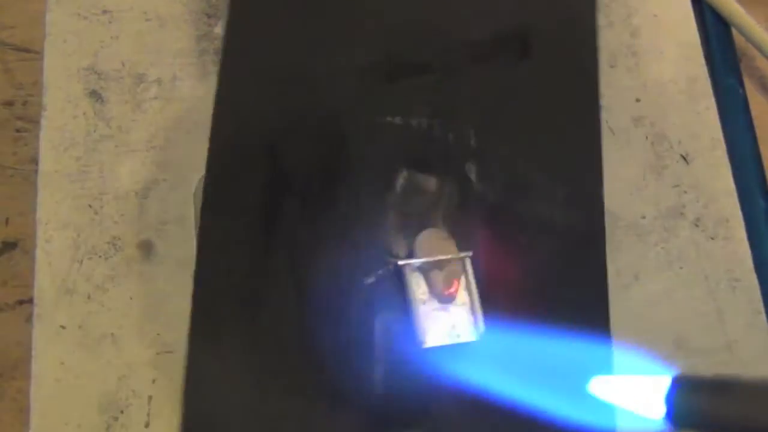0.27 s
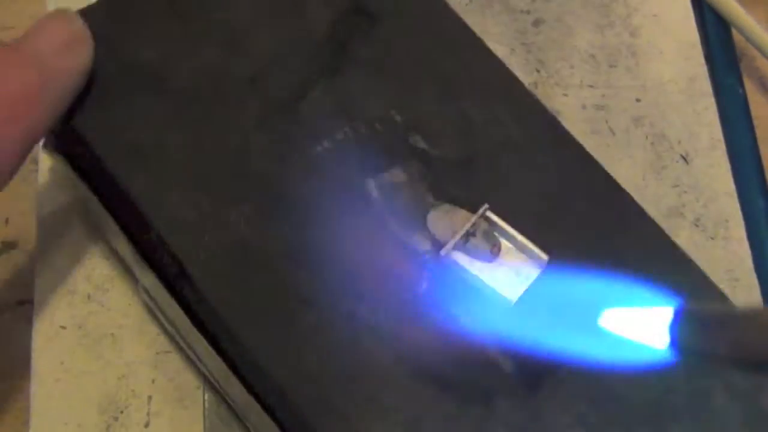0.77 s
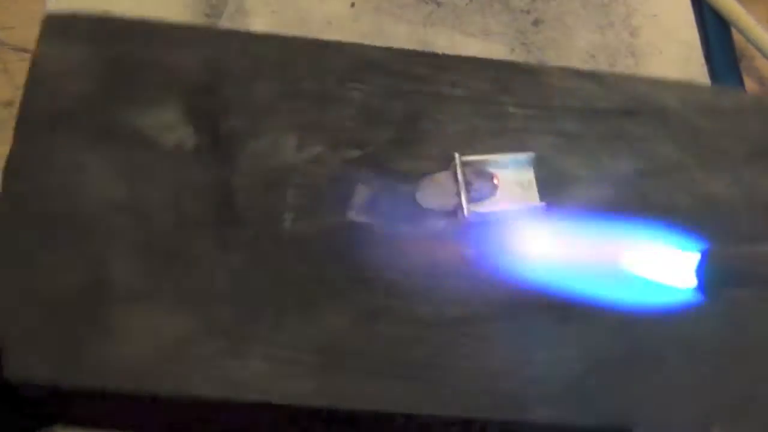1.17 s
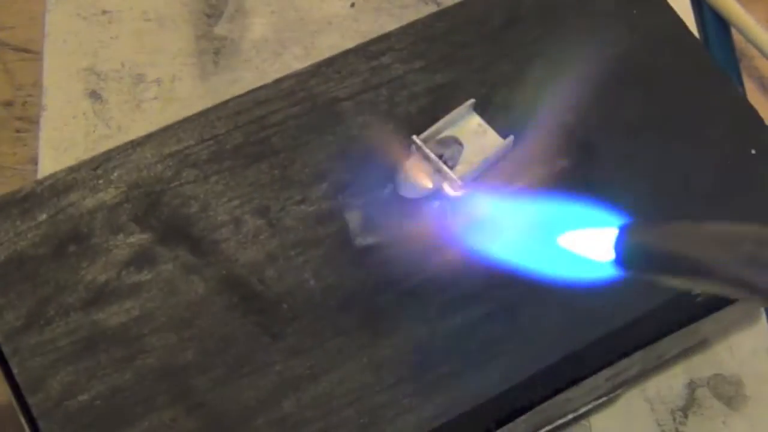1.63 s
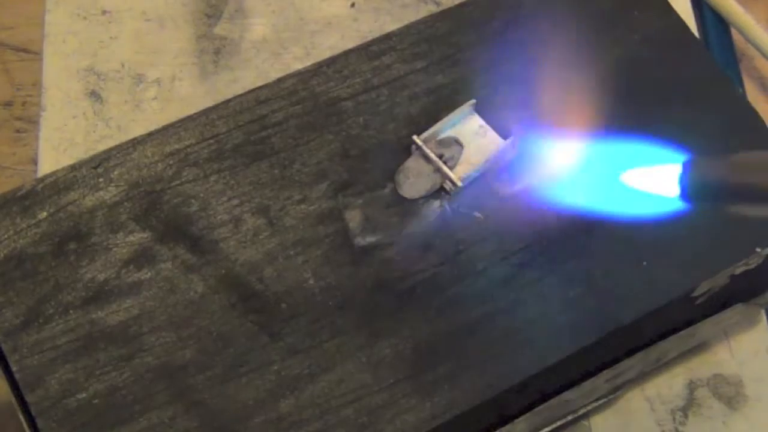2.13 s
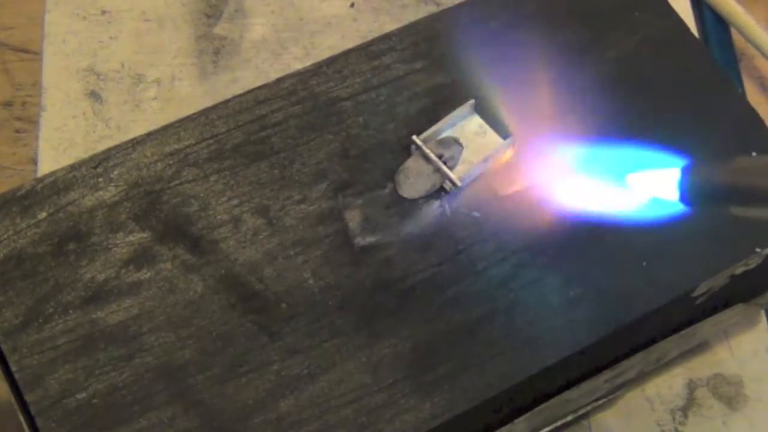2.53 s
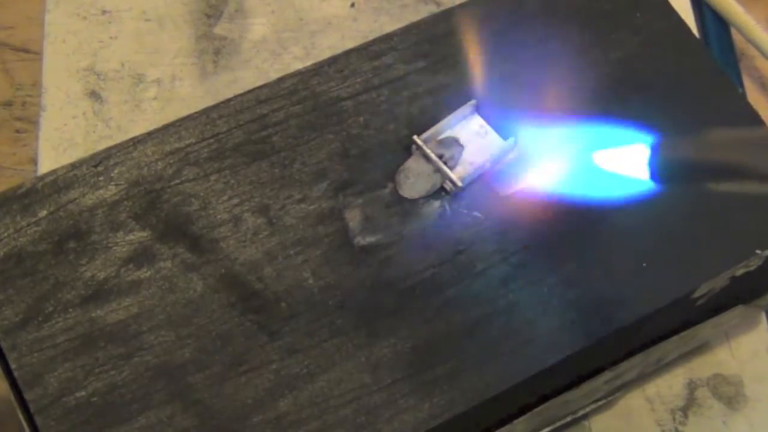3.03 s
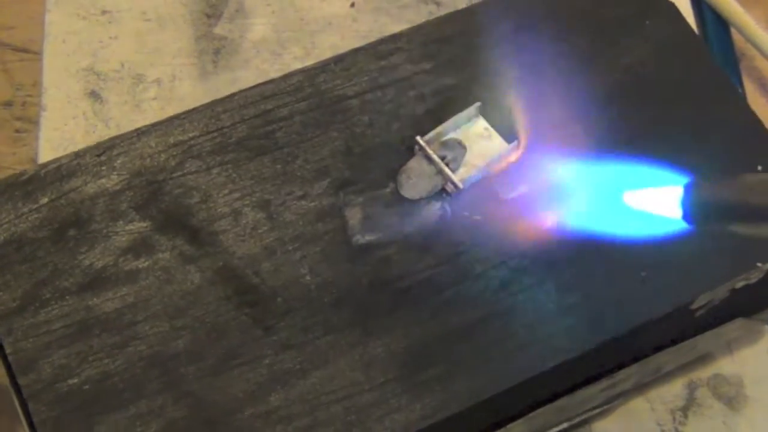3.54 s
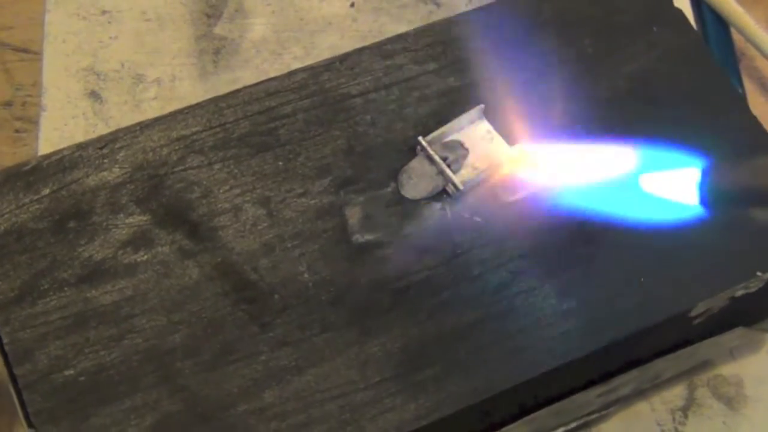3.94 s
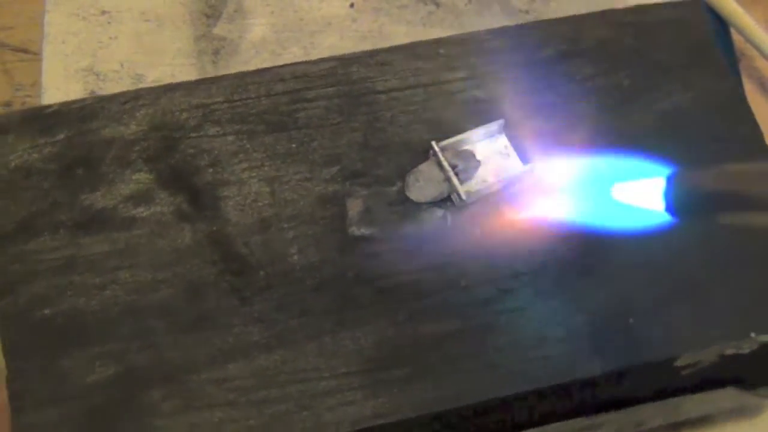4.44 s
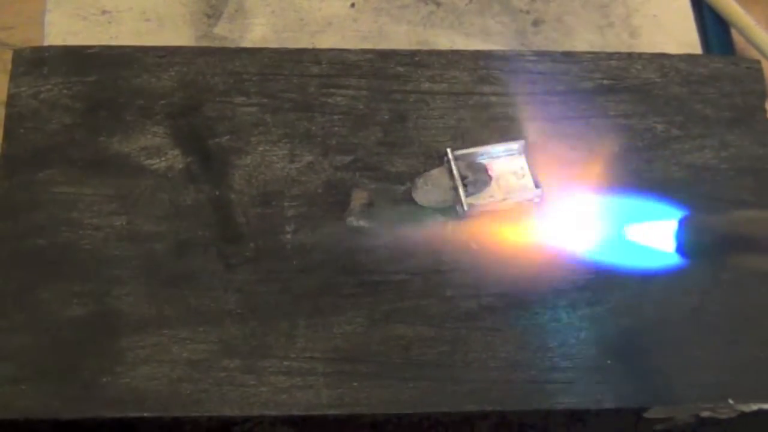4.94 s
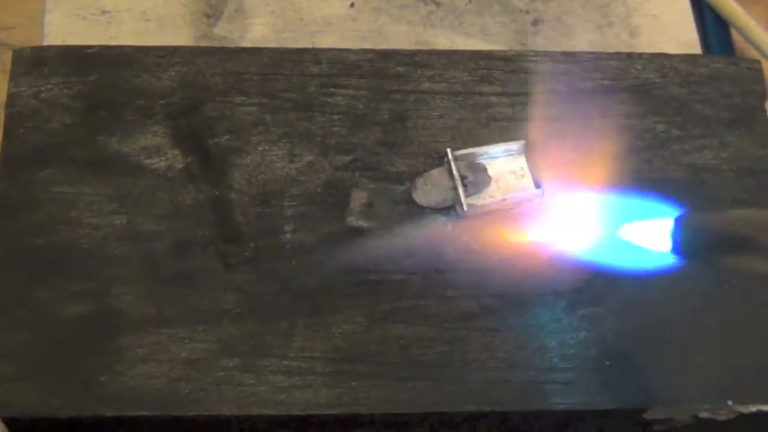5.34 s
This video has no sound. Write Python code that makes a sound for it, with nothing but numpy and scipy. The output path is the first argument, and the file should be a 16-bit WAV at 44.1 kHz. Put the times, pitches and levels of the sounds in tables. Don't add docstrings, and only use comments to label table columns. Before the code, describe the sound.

Close, continuous hiss and fluttering roar of a hand torch, peppered with tiny dry pops, its tone sliding as the flame sweeps over metal.

```python
import sys
import numpy as np
from scipy import signal
from scipy.fft import rfft, irfft, next_fast_len
from scipy.io import wavfile
from scipy.ndimage import uniform_filter1d, map_coordinates

SR = 44100
rng = np.random.default_rng(int(sys.argv[2]) if len(sys.argv) > 2 else 0)


def inscribe(sig):
    pcm = np.round(np.clip(np.atleast_2d(sig).T, -1, 1) * 32767)
    wavfile.write(sys.argv[1], SR, pcm.astype(np.int16))


def voltage_ratio(decibels):
    exponent = np.asarray(decibels, float) / 20
    return 10 ** exponent


N = 246959
T_S = np.arange(N) / SR
MEAN_HEIGHT_CM = 4.6


def unit(x):
    return x / np.sqrt(np.mean(x ** 2) + 1e-20)


def along(points, hz):
    f, v = np.transpose(points)
    return np.interp(np.log(hz + 1), np.log(f + 1), v)


def modes_db(modes, hz):
    return sum(db / (1 + ((hz - centre) / width * 2) ** 2) for centre, width, db in modes)


def wobble(rate_hz):
    return map_coordinates(rng.standard_normal(N // 64), [T_S * rate_hz])


def coloured(x, level_db, lag=1, turn_rad=0):
    size = next_fast_len(N + 8192)
    gain = voltage_ratio(level_db(np.fft.rfftfreq(size, 1 / SR)))
    cepstrum = irfft(np.log(gain), size)
    cepstrum[1:size // 2] *= 2
    cepstrum[size // 2 + 1:] = 0
    response = rfft(cepstrum)
    transfer = np.exp(response.real + 1j * (lag * response.imag + turn_rad))
    return irfft(rfft(x, size) * transfer, size)[..., :N]


def wide_noise(level_db, width):
    mid = coloured(rng.standard_normal(N), level_db)
    side = coloured(rng.standard_normal(N), lambda hz: level_db(hz) + along(width, hz))
    return unit(np.array([mid + side, mid - side]))


def workshop():
    # f/Hz, level/dB
    air = [(5, -10), (14, -17), (25, -19), (42, -18), (52, -19), (80, -19), (108, -11), (166, -13),
           (198, -9), (238, -12), (376, -11), (408, -13), (700, -4), (910, -34), (1540, -120)]
    # f/Hz, side re mid/dB
    air_width = [(30, -55), (60, -30), (90, -20), (160, -13.5), (600, -16.5)]
    # f/Hz, peak/dB, growth/(dB/s), phase drift/rad
    partials = [(14.12, -65, 0, .05), (28.24, -77, 0, .1), (42.4, -76, 0, .2), (59.2, -72, 0, .4),
                (119.9, -76, 2, .3), (156, -84, -1, 1.2), (193.0, -78.5, 0, 1.4)]
    loudest_s, sag_db_per_s2 = 2.7, .8
    hum = np.zeros(N)
    for hz, db, growth_db_per_s, drift_rad in partials:
        level_db = db + growth_db_per_s * (T_S - 4.5) + 1.2 * wobble(1.9)
        if 50 < hz < 70:
            level_db -= sag_db_per_s2 * (T_S - loudest_s) ** 2
        hum += voltage_ratio(level_db) * np.sin(2 * np.pi * hz * T_S + drift_rad * wobble(5))
    return hum + voltage_ratio(-63.5) * wide_noise(lambda hz: along(air, hz), air_width)


def room(x, side_db):
    # f/Hz, t60/s
    decay = [(300, 1), (2000, 0.057), (10000, 0.96)]
    hz, t_s, z = signal.stft(rng.standard_normal((2, SR // 3)), SR, nperseg=256)
    fading = voltage_ratio(-60 * t_s / along(decay, hz)[:, None])
    mid, side = signal.istft(z * fading, SR, nperseg=256)[1]
    tail = np.array([mid + voltage_ratio(side_db) * side, mid - voltage_ratio(side_db) * side])
    delayed = np.pad(x, (60, 0))[None]
    return signal.fftconvolve(delayed, tail / np.linalg.norm(mid), axes=1)[:, :N]


def height_cm():
    # t/s, height/cm
    turning_points = [(0.0, 4.8), (1.45, 4.8), (2.02, 4.36), (2.24, 4.4), (2.419, 4.8), (2.6, 4.16),
                      (2.797, 4.87), (3.02, 4.12), (3.28, 5.0), (3.58, 4.12), (3.86, 4.97), (4.1, 4.2),
                      (4.3, 4.82), (4.6, 4.12), (4.829, 4.35), (5.052, 4.16), (5.249, 4.92), (5.45, 4.2)]
    s, cm = np.transpose(turning_points)
    index = np.arange(len(s))
    step = np.interp(T_S, s, index)
    eased = np.floor(step) + (1 - np.cos(np.pi * (step % 1))) / 2
    return np.interp(eased, index, cm)


def vigour():
    # t/s, swell/dB, length/s
    flares = [(0.16, 5, .05), (0.36, 4, .2), (0.64, 2, .05), (0.86, 2, .05), (1.02, 3.5, .08),
              (1.42, 3, .08), (1.73, 3, .14), (2.42, 3, .08), (2.75, 2, .08), (2.93, 3, .05), (3.15, 5, .1),
              (3.29, 3, .06), (3.61, 4.5, .05), (4.04, 3, .05), (4.22, 3, .06), (4.58, 3, .03),
              (4.78, 3, .06), (4.95, 3, .06), (5.14, 5, .04), (5.3, 3, .12), (5.49, 1, .06)]
    # t/s, dip/dB
    falters = [(0.12, -5), (0.57, -5), (1.27, -5), (1.5, -3.5), (1.84, -4), (2.28, -5), (2.36, -3),
               (2.58, -4), (2.86, -4.5), (3.09, -6), (3.235, -7), (3.5, -3), (4.119, -5), (4.55, -4),
               (4.619, -5.5), (4.72, -5), (5.09, -6)]
    falter_s = .04
    lift_cm = height_cm() - MEAN_HEIGHT_CM
    moments = flares + [(s, db, falter_s) for s, db in falters]
    surge_db = sum(db * np.exp(-(2 * (T_S - s) / length_s) ** 2) for s, db, length_s in moments)
    roar_db = -48 - 1.1 * lift_cm + 0.24 * surge_db
    crackle_db = -55.5 + 0.5 * lift_cm + 0.4 * surge_db
    hiss_db = -51.5 - 1.1 * lift_cm + 0.21 * surge_db
    return roar_db, crackle_db, hiss_db


def tube_db(hz):
    # f/Hz, width/Hz, peak/dB
    tube_modes = [(4160, 350, 5), (5230, 300, 6), (6300, 350, 4), (7300, 350, 2), (8400, 350, 4),
                  (9450, 300, 5), (10500, 350, 3), (11500, 300, 5), (12650, 350, 4), (13600, 350, 6),
                  (14700, 350, 6)]
    return modes_db(tube_modes, hz)


def patches(x, depth_db):
    z = signal.stft(x, nperseg=512)[2]
    field = uniform_filter1d(rng.standard_normal(z.shape[1:]), 5, 0)
    field = uniform_filter1d(field, 40, 1)
    return signal.istft(z * voltage_ratio(depth_db * unit(field)), nperseg=512)[1][:, :N]


def gas():
    # f/Hz, level/dB
    jet_colour = [(1500, -30), (3000, -12), (5000, -3), (7000, -6), (8700, -9), (9600, -1), (11400, -1),
                  (12200, -5), (14000, -6.5), (15900, -6)]
    # f/Hz, side re mid/dB
    jet_width = [(3000, 6.5), (4200, -22), (6000, -16), (8400, 6.5), (11000, -22), (12600, -13),
                 (15000, -24)]
    hiss_db = vigour()[2]
    jet = wide_noise(lambda hz: along(jet_colour, hz) + tube_db(hz), jet_width)
    turning = patches(jet, depth_db=2.2)
    return voltage_ratio(hiss_db - 10.0) * unit(turning)


def puffs():
    # t/s, swell/dB, length/s
    gas_puffs = [(0.1423, 7.5, 0.004), (0.1679, 7.5, 0.005), (0.2437, 6.5, 0.007), (0.2665, 7.5, 0.005),
                 (0.284, 7.5, 0.005), (0.3079, 7.5, 0.006), (0.353, 7.5, 0.013), (0.366, 7.0, 0.005),
                 (0.402, 10.5, 0.005), (0.4293, 8.5, 0.005), (0.6379, 7.5, 0.005), (0.6555, 7, 0.004),
                 (0.7684, 7, 0.004), (0.859, 7, 0.008), (1.0203, 7, 0.011), (1.0794, 7, 0.01),
                 (1.11, 7.5, 0.005), (1.2334, 9.0, 0.0046), (1.2748, 7, 0.004), (1.4063, 7, 0.008),
                 (1.4772, 7, 0.004), (1.6223, 7.0, 0.005), (1.6707, 7, 0.008), (1.7237, 7.5, 0.005),
                 (1.7417, 8, 0.006), (1.7673, 7.5, 0.005), (1.9644, 7, 0.005), (2.4208, 6.5, 0.014),
                 (2.5281, 6.5, 0.004), (2.6546, 7.5, 0.007), (2.7096, 7, 0.006), (2.7507, 8, 0.008),
                 (2.7714, 7.5, 0.008), (3.0528, 7, 0.006), (3.128, 8, 0.008), (3.148, 7, 0.008),
                 (3.195, 7, 0.008), (3.216, 7, 0.005), (3.2793, 8, 0.01), (3.3004, 7.5, 0.006),
                 (3.313, 7.5, 0.005), (3.5971, 7.5, 0.005), (3.6088, 6.5, 0.005), (3.632, 6.5, 0.013),
                 (3.693, 7.0, 0.005), (3.7463, 7.5, 0.008), (3.7879, 6.5, 0.005), (3.9061, 6.5, 0.005),
                 (4.2663, 6.5, 0.006), (4.5821, 7, 0.01), (4.9521, 7.5, 0.005), (4.973, 7.5, 0.005),
                 (5.1321, 7.5, 0.006), (5.2103, 7, 0.012), (5.252, 6.5, 0.005), (5.2879, 8, 0.005),
                 (5.3078, 7.5, 0.005), (5.3293, 9.5, 0.005), (5.48, 7.5, 0.005), (5.565, 7, 0.006),
                 (0.0093, 5.5, 0.005), (0.0787, 6, 0.005), (0.2167, 6.5, 0.006), (0.3206, 6, 0.009),
             (0.3866, 6, 0.005), (0.4864, 6.5, 0.005), (0.5324, 6.5, 0.009), (0.5957, 6.0, 0.005),
             (0.6092, 5.5, 0.005), (0.7123, 5.5, 0.005), (0.7289, 6.0, 0.004), (0.936, 6, 0.005),
             (0.949, 6.0, 0.012), (0.9928, 5.5, 0.005), (1.0434, 6.5, 0.005), (1.3451, 6, 0.005),
             (1.3584, 5.0, 0.004), (1.396, 5.5, 0.006), (1.4322, 6, 0.006), (1.6015, 6, 0.005),
             (1.6415, 5.5, 0.005), (1.8579, 7, 0.004), (1.9251, 5.5, 0.005), (2.1572, 5.5, 0.008),
             (2.3079, 6.5, 0.005), (2.3626, 6, 0.006), (2.4099, 5.5, 0.004), (2.4406, 6, 0.005),
             (2.452, 5, 0.005), (2.5522, 5.5, 0.013), (2.6108, 6.5, 0.006), (2.729, 6, 0.005),
             (2.8336, 5, 0.004), (2.8481, 6.5, 0.005), (2.9096, 6, 0.012), (2.9391, 6, 0.004),
             (2.976, 6, 0.007), (3.1674, 6, 0.005), (3.1868, 6.5, 0.004), (3.3552, 5.5, 0.008),
             (3.3677, 6.5, 0.004), (3.4234, 6, 0.005), (3.5028, 5, 0.006), (3.558, 5.5, 0.006),
             (3.7697, 5.5, 0.005), (3.851, 5.5, 0.005), (3.8627, 6, 0.005), (4.1807, 6.5, 0.01),
             (4.2187, 6, 0.008), (4.2346, 6.5, 0.005), (4.3519, 6.5, 0.01), (4.394, 6, 0.007),
             (4.5181, 6, 0.005), (4.7546, 5.5, 0.017), (4.8064, 5.5, 0.007), (4.8714, 5.5, 0.005),
             (4.9977, 5.5, 0.004), (5.1426, 5.5, 0.009), (5.4077, 6, 0.005), (5.528, 5, 0.004),
                 (0.0868, 5.5, 0.004), (0.157, 7.0, 0.004), (0.1749, 7.5, 0.004), (0.199, 6.0, 0.004),
             (0.285, 7.5, 0.004), (0.3295, 7.0, 0.004), (0.41, 6.0, 0.004), (0.8868, 6.5, 0.004),
             (1.1096, 7.5, 0.004), (1.4614, 6.5, 0.004), (1.6784, 6.0, 0.004), (1.7686, 8.0, 0.004),
             (1.7997, 6.5, 0.004), (1.8551, 7.0, 0.004), (1.9508, 6.0, 0.004), (1.9777, 6.0, 0.004),
             (2.0646, 6.5, 0.004), (2.1266, 5.5, 0.004), (2.1502, 6.5, 0.004), (2.2115, 6.0, 0.004),
             (2.3527, 6.0, 0.004), (2.3621, 7.0, 0.004), (2.5262, 7.0, 0.004), (2.5886, 6.0, 0.004),
             (2.6545, 7.5, 0.004), (2.6716, 6.0, 0.004), (2.6843, 6.5, 0.004), (3.0132, 6.0, 0.004),
             (3.3659, 7.5, 0.004), (3.4011, 6.0, 0.004), (3.4117, 6.0, 0.004), (3.4241, 7.0, 0.004),
             (3.6924, 7.5, 0.004), (3.7705, 7.0, 0.004), (3.8394, 6.5, 0.004), (3.9346, 6.0, 0.004),
             (3.9743, 6.0, 0.004), (3.9918, 6.0, 0.004), (4.1806, 7.5, 0.004), (4.2105, 7.0, 0.004),
             (4.3749, 5.5, 0.004), (4.4126, 6.5, 0.004), (4.4663, 6.0, 0.004), (4.5182, 7.0, 0.004),
             (4.5705, 6.5, 0.004), (4.657, 6.5, 0.004), (4.7449, 6.5, 0.004), (4.7633, 6.5, 0.004),
             (4.881, 6.5, 0.004), (4.9231, 6.5, 0.004), (4.9452, 6.0, 0.004), (5.1304, 8.0, 0.004),
             (5.1828, 6.0, 0.004), (5.251, 7.5, 0.004), (5.2789, 6.0, 0.004), (5.3296, 8.5, 0.004),
             (5.371, 6.5, 0.004), (5.4078, 7.0, 0.004), (5.4809, 7.5, 0.004), (5.5171, 6.5, 0.004)]
    half = 1024
    swell_db = np.zeros(N + 2 * half)
    near_s = np.arange(-half, half) / SR
    for s, db, length_s in gas_puffs:
        start = round(s * SR)
        span = slice(start, start + 2 * half)
        bell_db = db * np.exp(-(near_s / (.52 * length_s)) ** 2)
        swell_db[span] = np.maximum(swell_db[span], bell_db)
    return swell_db[half:N + half]


def crackle(level_db, flutter_db, count, spread_db):
    # t/s, peak/dB
    loud_pops = [(0.1425, -37), (0.1666, -36), (0.2653, -37), (0.3076, -37), (0.3529, -37), (0.4022, -34),
                 (0.4308, -37), (0.4926, -36), (0.6367, -36), (0.768, -37), (0.8576, -37), (1.0172, -38),
                 (1.1103, -36), (1.2333, -37), (1.4756, -37), (1.6228, -36), (1.7233, -36), (1.768, -35),
                 (1.8545, -37), (2.3065, -38), (2.5257, -37), (2.7709, -37), (3.1284, -35), (3.2791, -37),
                 (3.5977, -37), (4.2359, -37), (4.9219, -37), (5.3077, -36), (5.4803, -35), (5.5655, -37)]
    # f/Hz, level/dB
    pop_colour = [(100, -70), (300, -20.5), (900, -5), (1500, 1), (2500, 11), (3800, -0.5), (6000, -8),
                  (8000, -5.5), (10500, -5.5), (12000, -18.5), (13500, -12), (15900, -20)]
    inverted_share = .3
    place, size, kind = rng.random((count, 3)).T
    density = np.cumsum(voltage_ratio(1.2 * level_db + flutter_db))
    at = np.searchsorted(density / density[-1], place).clip(0, N - 1)
    sizes_db = np.minimum(-spread_db * np.log(size + 1e-9), 8.5)
    sign = np.where(kind < inverted_share, -1, 1)
    shocks = np.bincount(at, sign * voltage_ratio(sizes_db - 37.5), N)
    s, peak_db = np.transpose(loud_pops)
    shocks += np.bincount(np.round(s * SR).astype(int), voltage_ratio(peak_db + 6.0), N)[:N]
    return coloured(shocks, lambda hz: along(pop_colour, hz) + .9 * tube_db(hz), lag=.5, turn_rad=np.pi / 2)


def echo(x, detour_cm, slope, spread_cm):
    path_cm = detour_cm + slope * (height_cm() - MEAN_HEIGHT_CM)
    path_cm = path_cm + .15 * wobble(7) + .06 * wobble(60)
    path_cm = path_cm + np.array([[spread_cm], [-spread_cm]])
    late = np.arange(N) - path_cm / 34300 * SR
    return map_coordinates(x, [late], order=3)


def burn():
    # f/Hz, density/(dB/Hz)
    roar_colour = [(200, -30.5), (320, -22.5), (525, -21), (854, -2.5), (977, -4), (1250, 0.5), (1550, 6),
                   (2000, -3.5), (2400, -6.5), (3000, -2.5), (3500, -18), (4260, -15.5), (5500, -29.5),
                   (8000, -57.5)]
    roar_db, crackle_db, _ = vigour()
    eddies = .3 * wobble(40) + .7 * wobble(110) + .85 * wobble(230)
    eddies -= uniform_filter1d(eddies, size=SR // 16)
    puffs_db = puffs()
    swell = voltage_ratio(0.88 * eddies + 0.12 * puffs_db + 2.9 * wobble(400))
    roar = unit(coloured(swell * rng.standard_normal(N), lambda hz: along(roar_colour, hz)))
    flutter_db = np.minimum(2.2 * eddies + 2.7 * puffs_db, 22)
    return voltage_ratio(roar_db - 1.5) * roar + crackle(crackle_db, flutter_db, count=5600, spread_db=3.0)


def flame():
    burning = burn()
    block = 0.36 * echo(burning, detour_cm=5.05, slope=3.8, spread_cm=0.017)
    housing = 0.28 * echo(burning, detour_cm=6.05, slope=0, spread_cm=0.034)
    turned_s, turn_s = 1.43, 0.051
    turned = 1 / (1 + np.exp((turned_s - T_S) / turn_s))
    near = 0.24 * echo(burning, detour_cm=10.59 + 3.57 * turned, slope=4.2, spread_cm=0.076)
    far = 0.19 * turned * echo(burning, detour_cm=18.32, slope=0.8, spread_cm=0.14)
    low = np.clip(.55 - 0.62 * (height_cm() - MEAN_HEIGHT_CM), 0, 1)
    piece = low * (near + far)
    hand_s, hand_stays_s, hand_db = .95, 1, -0.5
    reach = np.exp(-((T_S - hand_s) / hand_stays_s) ** 4)
    shade_db = np.outer([hand_db, -hand_db], reach) / 2
    return (burning + block + housing + piece) * voltage_ratio(shade_db)


def scene():
    fire = flame()
    answer = voltage_ratio(-14.0) * room(fire.mean(axis=0), side_db=-10.5)
    return workshop() + gas() + answer + fire


def low_pass(x):
    return signal.sosfilt(signal.butter(12, 16460, fs=SR, output="sos"), x)


def record(dry):
    # f/Hz, left re right/dB
    ports = [(60, 0.0), (110, 0.0), (200, 0.0), (380, -1.0), (700, -0.5), (1290, -0.6), (1800, -1.3),
             (2600, -0.2), (4400, -3.8), (8120, -2.3), (15000, -1)]
    # f/Hz, width/Hz, peak/dB
    housing_modes = [(1570, 77, -1.5), (1644, 270, 1), (2190, 120, -1), (2274, 175, 2.5), (2480, 106, -2),
                     (2870, 130, -3), (4420, 130, 2), (5050, 160, -3.5), (5870, 440, 4), (8250, 250, -0.5),
                     (8640, 140, 1), (11520, 160, 4.5), (12400, 310, 0.5), (13100, 500, 0.5),
                     (15050, 250, 1)]
    top_hz = 15790
    hz = np.fft.rfftfreq(N, 1 / SR)
    port_db = np.array([[.5], [-.5]]) * along(ports, hz)
    spectrum = rfft(dry) * voltage_ratio(port_db) * (hz < top_hz)
    spectrum *= voltage_ratio(modes_db(housing_modes, hz))
    return low_pass(irfft(spectrum, N))


dry = scene()
out = record(dry)
inscribe(out)
```